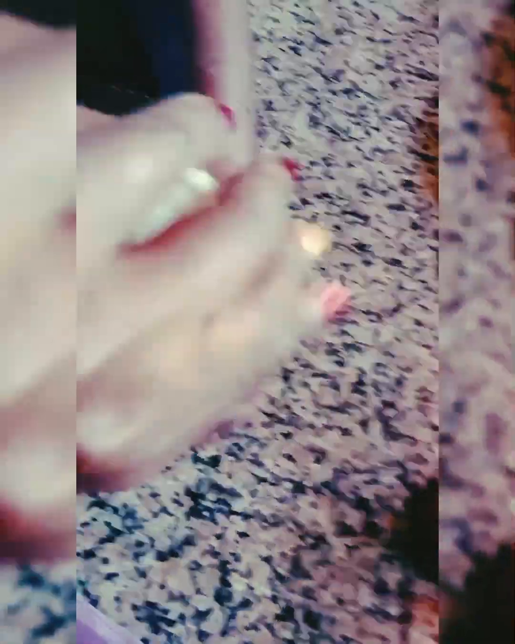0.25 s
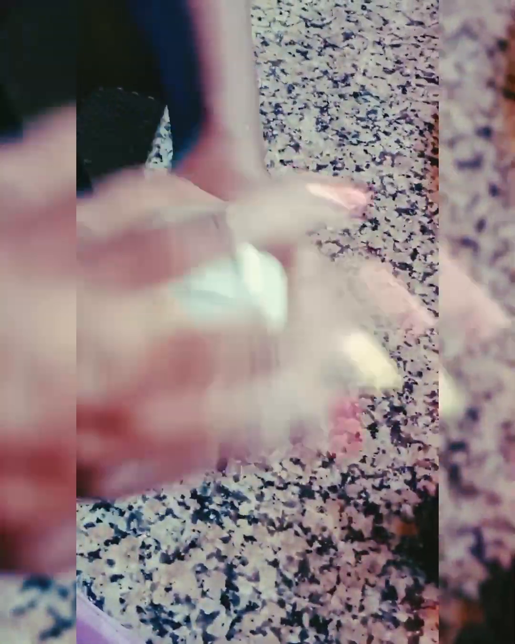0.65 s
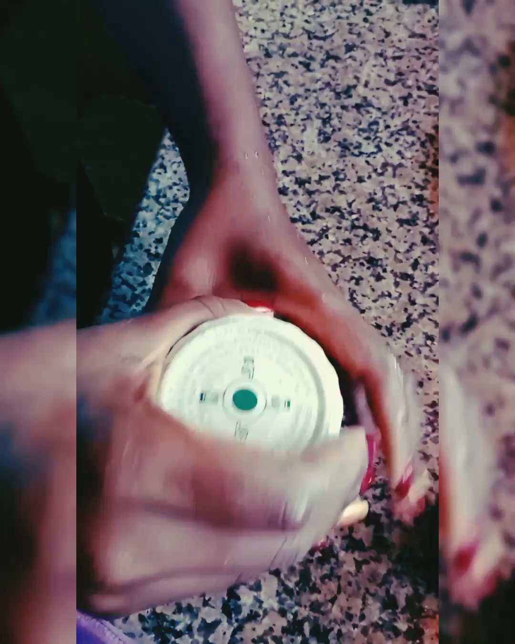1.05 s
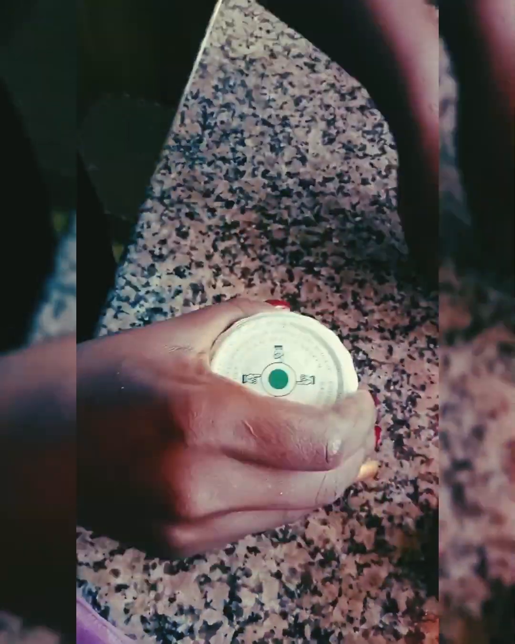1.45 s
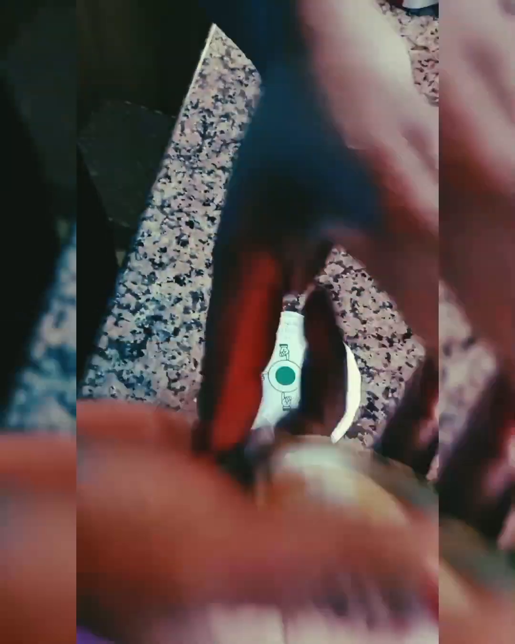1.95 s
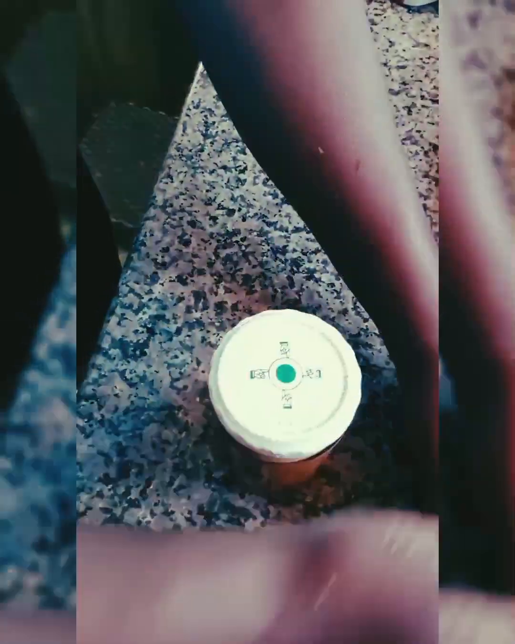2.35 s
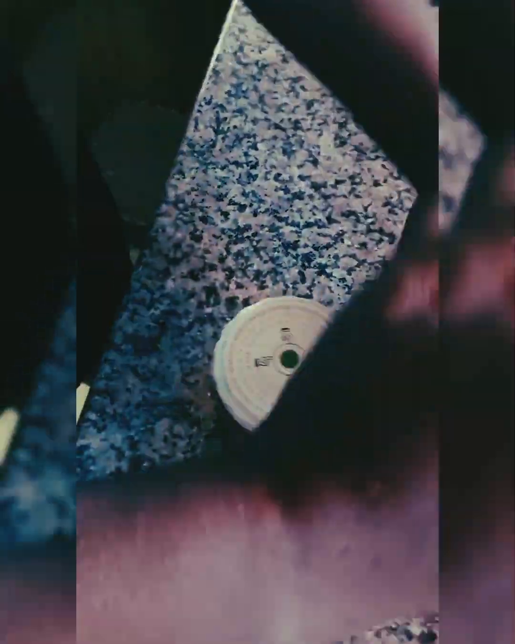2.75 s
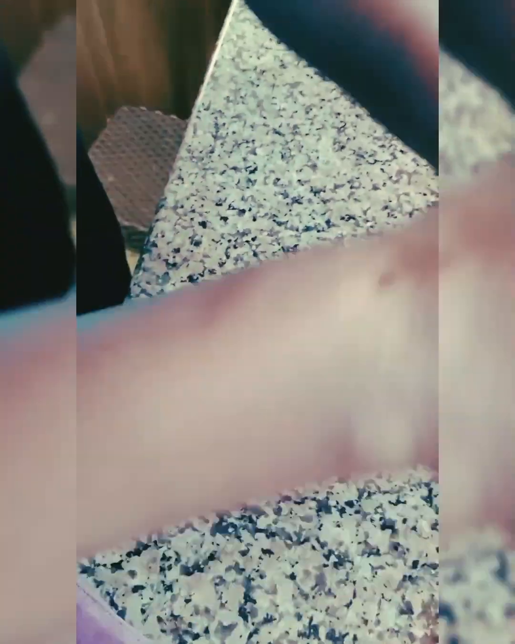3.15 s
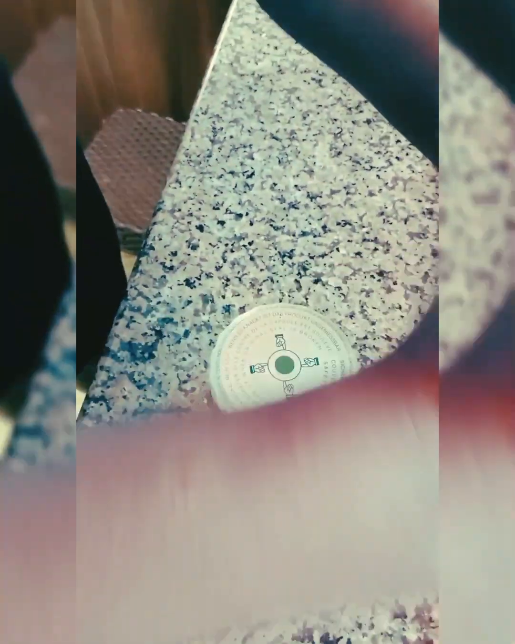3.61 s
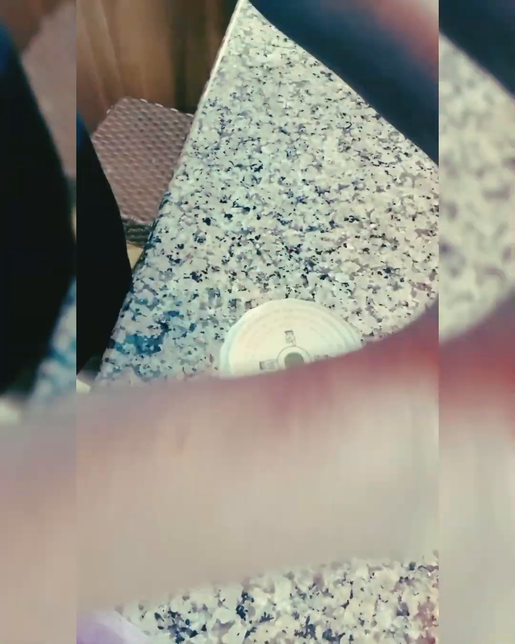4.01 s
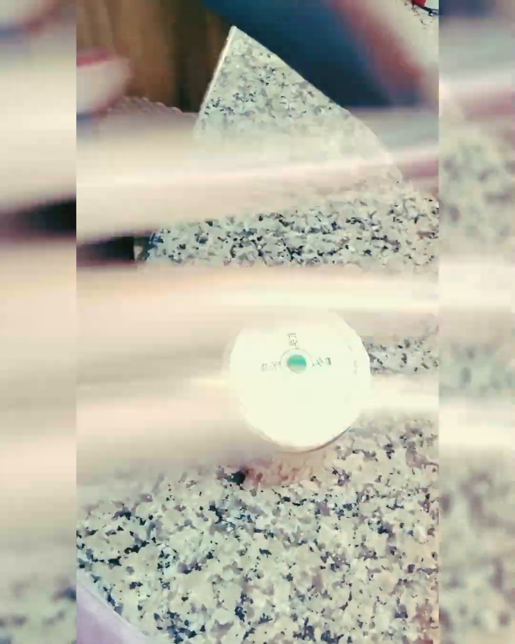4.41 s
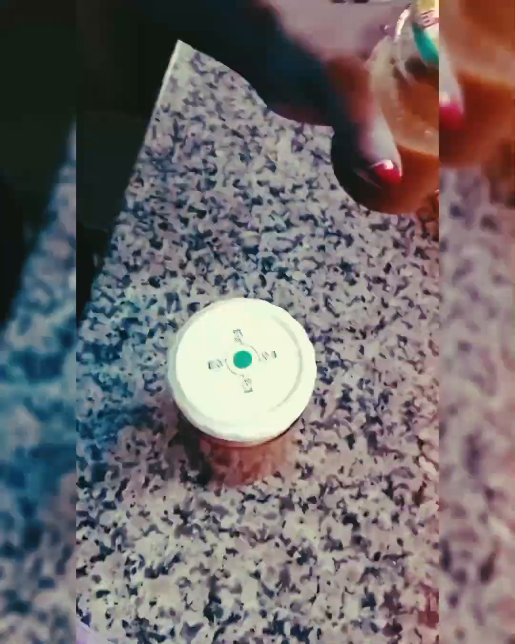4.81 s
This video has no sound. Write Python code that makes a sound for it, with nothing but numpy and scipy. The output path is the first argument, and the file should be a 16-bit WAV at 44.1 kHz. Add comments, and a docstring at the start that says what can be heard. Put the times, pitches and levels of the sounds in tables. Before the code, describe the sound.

Close handling of a lidded glass jar on a stone counter in a small reverberant kitchen. Faint taps and rubbing first, then two clusters of dull heavy knocks, a pause, and a busy run of bright lid snaps with hollow pops, another hard knock, scrapes and ticks. It ends nearly quiet over a low wash. The phone-like microphone is muffled on top, and loud hits clip.

```python
"""In a small, hard-walled kitchen, glass jars are set down on a stone countertop and a metal lid is worked.
Jars are dying sines with a noise thud; lid snaps crack, ring the rim and pump the pocket of air under it.
Soft taps and light ticks use parts of the snap; random slips make the scrapes, gliding sines the squeaks.
Noise echoes make the room, over a low steady wash.
The microphone colours the sound, its gain control ducks after loud hits, and the highest peaks clip."""
import sys
import numpy as np
from scipy import signal
from scipy.io import wavfile

SR = 44100
rng = np.random.default_rng(int(sys.argv[2]) if len(sys.argv) > 2 else 0)


def file_out(sig):
    """Save sig as 16-bit WAV at sys.argv[1]."""
    # one column per channel
    cols = np.atleast_2d(sig).T
    # limit, then scale
    lim = np.clip(cols, -1, 1)
    pcm = np.round(lim * 32767).astype(np.int16)
    wavfile.write(sys.argv[1], SR, pcm)


N = 223570  # length in samples, about 5.07 s


def amp(db):
    """Turns decibels into a gain."""
    return 10 ** (np.asarray(db) / 20)


def evened(x):
    """Scales a sound to an average (rms) level of 1."""
    return x / np.sqrt(np.mean(x ** 2) + 1e-20)


def read(points, hz):
    """Reads a table between its points, on a log-frequency axis."""
    table_hz, value = np.transpose(points)
    return np.interp(np.log(hz + 1), np.log(table_hz + 1), value)


def add(mix, s, sound):
    """Mixes a sound in at time s, cutting what runs past the end."""
    part = mix[max(round(s * SR), 0):][:len(sound)]
    part += sound[:len(part)]


def colour(x, points, size=4096):
    """Filters a sound to the given spectrum, with no sound before its cause (minimum phase)."""
    log_gain = np.log(amp(read(points, abs(np.fft.fftfreq(size, 1 / SR)))))
    spectrum = np.exp(np.conj(signal.hilbert(log_gain)))
    response = np.fft.ifft(spectrum).real[:size // 2]
    return signal.oaconvolve(x, response)[:len(x)]


def soften(x, hz, order=2):
    """Takes away treble above hz, as a softer, longer contact does."""
    lowpass = signal.butter(order, min(hz, SR / 2 - 100), fs=SR, output="sos")
    return signal.sosfilt(lowpass, x)


def decay(t, t60):
    """Dies away by 60 dB in t60 seconds."""
    return np.exp(-np.log(1000) * t / t60)


def ring(modes, t):
    """Dying sines of a struck object; neighbouring modes swing in opposite directions."""
    out = np.zeros(len(t))
    for k, (hz, db, t60) in enumerate(modes):
        out += (-1) ** k * amp(db) * decay(t, t60) * np.sin(2 * np.pi * hz * t)
    return out


def resonate(x, peaks):
    """Passes a sound through resonances side by side, each applied twice to make it steep."""
    out = np.zeros(len(x))
    for hz, width, db in peaks:
        b, a = signal.iirpeak(hz, hz / width, SR)
        once = signal.lfilter(b, a, x)
        out += amp(db) * signal.lfilter(b, a, once)
    return evened(out)


# Spectrum of the thin metal's crack. Each row: frequency in Hz, relative level in dB.
CRACK_SPECTRUM = [(100, -29), (700, -14), (1600, -26), (2200, -1.5), (2850, 3), (3400, -1), (4300, 3.5),
                  (5000, -4.5), (5800, -2.5), (7500, -6), (16000, -1)]


def crack(t, bright_hz, crack_db=-7, crack_s=0.0046):
    """A few milliseconds of grit from the thin metal: coloured noise that dies quickly."""
    grit = evened(colour(rng.standard_normal(len(t)), CRACK_SPECTRUM)) * np.exp(-t / crack_s)
    return amp(crack_db) * soften(grit, bright_hz, order=4)


# Glass meets stone, each landing in several contacts.
# Each row: start in seconds, force in dB, brightness (where the treble starts to fall) in Hz.
KNOCK_CONTACTS = [(1.4348, 2.5, 1310), (1.4395, -1, 1100), (1.4474, -1.5, 1070), (1.4542, -7.5, 1000),
                  (1.6523, -3.5, 2760), (1.6606, -2, 2000), (1.6640, -8.5, 2000), (2.8214, -2, 3180),
                  (2.8285, -5.5, 2600), (2.836, 0, 2300), (2.8470, 5, 2570)]
# A jar standing on the stone; the lowest modes are the counter's.
# Each row: frequency in Hz, relative level in dB, time to die by 60 dB in seconds.
JAR_MODES = [(138, -20.5, 0.24), (247, -27, 0.5), (320, -24, 0.21), (620, -17, 0.063), (776, -19, 0.12),
             (932, -17, 0.022), (1003.8, -8, 0.11), (1038, -19, 0.28), (1108, -9, 0.064),
             (1260, -12.5, 0.063), (1428, -16, 0.0079), (1605, -20, 0.055), (1860, -29.5, 0.038),
             (2032, -36.5, 0.24), (2542, -14.5, 0.038), (2620, -14, 0.015), (3770, -28.5, 0.013)]
# Dull thud of counter and cabinet. Each row: frequency in Hz, relative level in dB.
THUD_SPECTRUM = [(40, -43.5), (75, -3.5), (115, 4), (180, -6.5), (300, 0), (550, -1.5), (1300, 0),
                 (2400, -12), (3400, -20.5), (6000, -22.5), (9000, -60.5)]


def knocks(ring_db=-4.0, thud_db=-10, thud_s=0.014, rise_s=0.0012, lid_db=-4):
    """Each contact rings the jar, thumps the counter and jolts the lid; the heavy glass starts gradually."""
    out, t = np.zeros(N), np.arange(SR // 2) / SR
    glass = ring(JAR_MODES, t)
    rise = 1 - np.exp(-t / rise_s)
    for s, force_db, bright_hz in KNOCK_CONTACTS:
        thud = evened(colour(rng.standard_normal(len(t)), THUD_SPECTRUM)) * np.exp(-t / thud_s)
        blow = soften((amp(ring_db) * glass + amp(thud_db) * thud) * rise, bright_hz)
        add(out, s, amp(force_db) * (blow + amp(lid_db) * crack(t, bright_hz)))
    return out


def air_pocket(t, hz, t60, bright_hz, swell_cycles=4, push_db=-14, push_s=0.0054):
    """The lid pumps the air under it: a puff and a short note, slower to start after a soft contact."""
    puff = soften(resonate(rng.standard_normal(len(t)), [(0.76 * hz, hz, 0)]), 2 * hz)
    push = amp(push_db) * evened(puff) * np.exp(-t / push_s)
    swell = 1 - np.exp(-t * bright_hz / swell_cycles)
    return (ring([(hz, 0, t60)], t) + push) * swell


# The metal lid snaps as it is worked. Each row: start in seconds, air pocket level in dB,
# air pocket pitch in Hz, air pocket time to die by 60 dB in seconds, crack level in dB,
# brightness in Hz, rim ring level in dB.
LID_SNAPS = [(2.4972, -5, 966, .075, -0.5, 9100, 3.5), (2.5803, -16.5, 663, 0.044, -36.5, 4000, -13.5),
             (2.6045, -6, 1041, 0.031, -1.5, 3800, -28), (2.6075, -0.5, 663, 0.042, -17, 3000, -23),
             (2.6308, -1, 564, 0.054, 0.5, 6500, -46), (2.9392, 0.5, 546, 0.039, -4, 5450, -22.5),
             (3.117, -19.5, 551, 0.05, -25, 3470, -59), (3.3830, 0.5, 807, 0.022, -8.5, 5160, -27),
             (3.3908, 0.5, 597, 0.0052, -5.5, 5430, -31.5)]
# Rim of lid and jar, damped by the hand.
# Each row: frequency in Hz, relative level in dB, time to die by 60 dB in seconds.
RIM_MODES = [(1400, -22, 0.043), (2810, -16, 0.057), (3792, -0.5, 0.014), (4019, -2, 0.0092),
             (4900, -22, 0.0088), (6380, -20, 0.011)]


def snaps():
    """The lid cracks, rings the rim and pumps the air under it."""
    out, t = np.zeros(N), np.arange(SR // 5) / SR
    for s, air_db, air_hz, air_t60, crack_db, bright_hz, rim_db in LID_SNAPS:
        metal = amp(crack_db) * crack(t, bright_hz) + amp(rim_db) * ring(RIM_MODES, t)
        air = amp(air_db) * air_pocket(t, air_hz, air_t60, bright_hz)
        add(out, s, metal + air)
    return out


# Dull taps and bumps on the lid. Each row: start in seconds, level in dB, air pocket pitch in Hz,
# level sent to the room in dB against the direct sound.
LID_TAPS = [(.008, -25, 940, 5), (0.018, -25.5, 1165, 2.5), (0.3864, -16.5, 1252, -10),
            (0.3862, -27.5, 1477, -0.5), (.421, -24.5, 317, 7), (2.3816, -11.5, 1121, -5.5),
            (2.388, -8, 1040, -7), (2.390, -21.5, 574, 7), (3.151, -33, 528, -7.5), (3.290, -19, 557, 2),
            (3.3226, -19, 770, -5), (3.4775, -14, 440, 3), (3.656, -7.5, 458, -9), (3.747, -13, 779, -15.5)]


def taps(air_t60=0.028, crack_db=-20.5, bright_hz=2130):
    """Soft contacts sound the air and barely crack the metal; gives direct sound and what the room gets."""
    direct, to_room, t = np.zeros(N), np.zeros(N), np.arange(SR // 5) / SR
    for s, db, air_hz, room_db in LID_TAPS:
        air = air_pocket(t, air_hz, air_t60, bright_hz)
        tap = air + amp(crack_db) * crack(t, bright_hz)
        add(direct, s, amp(db) * tap)
        add(to_room, s, amp(db + room_db) * tap)
    return direct, to_room


# Light ticks of fingernails and of the lid's edge catching. Each row: start in seconds, level in dB.
LIGHT_TICKS = [(.008, -24), (0.126, -36), (0.615, -40), (.7293, -42), (0.766, -39), (1.827, -47),
               (1.9995, -42.5), (3.3207, -31.5), (3.6872, -16), (3.72, -21), (3.7836, -28), (3.809, -25.5),
               (4.5299, -51), (5.016, -39)]


def ticks(bright_hz=5500):
    """Contacts too light to move the air: only the metal is heard."""
    out, t = np.zeros(N), np.arange(SR // 5) / SR
    for s, db in LIGHT_TICKS:
        add(out, s, amp(db) * crack(t, bright_hz))
    return out


# Lid and glass rub in short strokes. Each row: start in seconds, push in seconds,
# ease-off in seconds, hollow level in dB, rasp level in dB.
RUB_STROKES = [(0, 0.004, .15, -35, -38.5), (.19, 0.046, 0.29, -49.5, -58.5),
               (.385, 0.088, 0.71, -48, -56.5), (3.284, 0.053, 0.094, -28.5, -49.5),
               (3.395, 0.096, .17, -20.5, -33.5), (3.629, 0.039, 0.14, -19.5, -32.5),
               (4.121, 0.073, 0.11, -40.5, -42.5), (4.34, 0.068, 0.29, -62, -62),
               (5.005, 0.066, 0.081, -47, -48)]
# Low resonances of the jar's air. Each row: frequency in Hz, width of one pass in Hz, relative level in dB.
HOLLOW_PEAKS = [(309, 94, -10.5), (445, 166, 1.5), (589, 138, -1), (811, 47.4, 6.5), (1040, 164, -12.5)]
# High resonances of the lid's rim. Each row: frequency in Hz, width of one pass in Hz, relative level in dB.
RASP_PEAKS = [(2060, 120, 7.5), (2410, 1140, 11), (2820, 140, -6), (3190, 1500, 0), (4026, 220, 7.5),
              (4290, 270, -1), (5250, 3000, -15)]
# A stroke swells to its hardest push, then eases off; both ends fade over the edge time.
STROKE_START_DB, STROKE_END_DB, STROKE_EDGE_S = -11, -26, 0.0062


def scrapes(slips_per_s=300, uneven_db=3.5, hiss=0.11, hollow_db=-3, rasp_db=-3):
    """Tiny uneven slips excite the jar's air and the lid's rim, as strongly as the hand pushes."""
    slip_size = amp(uneven_db * np.minimum(rng.exponential(1, N), 3))
    slips = (rng.random(N) < slips_per_s / SR) * slip_size
    drive = slips * rng.choice([-1, 1], N) + hiss * rng.standard_normal(N)
    hollow = resonate(drive, HOLLOW_PEAKS)
    rasp = resonate(drive, RASP_PEAKS)
    out, t = np.zeros(N), np.arange(N) / SR
    for start, push_s, ease_s, low_db, high_db in RUB_STROKES:
        top = start + push_s
        end = top + ease_s
        touching = np.clip(np.minimum(t - start, end - t) / STROKE_EDGE_S, 0, 1)
        push_db = np.interp(t, [start, top, end], [STROKE_START_DB, 0, STROKE_END_DB])
        rub = amp(hollow_db + low_db) * hollow + amp(rasp_db + high_db) * rasp
        out += touching * amp(push_db) * rub
    return out


# Thin squeaks of the rubbing. Each row: start in seconds, length in seconds,
# starting pitch in Hz, final pitch in Hz (both before the waver), level in dB.
RUB_SQUEAKS = [(1.521, .1, 4320, 4160, -58), (4.209, 0.041, 4080, 5800, -56)]


def squeaks(waver=0.039, curve=2.7):
    """Stick and slip make short, unsteady whistles whose glide steepens towards the end."""
    out = np.zeros(N)
    for start, length, from_hz, to_hz, db in RUB_SQUEAKS:
        along = np.arange(0, length, 1 / SR) / length
        glide = from_hz + (to_hz - from_hz) * along ** curve
        pitch = glide * (1 + waver * evened(soften(rng.standard_normal(len(along)), 500)))
        whistle = np.sin(2 * np.pi * np.cumsum(pitch) / SR)
        add(out, start, amp(db) * whistle * signal.windows.tukey(len(along), .2))
    return out


# Ring of the kitchen. Each row: frequency in Hz, time to die by 60 dB in seconds.
KITCHEN_DECAY = [(120, 0.61), (400, 0.37), (1000, 0.47), (2500, 0.48), (4500, 0.31), (7000, 0.27),
                 (10000, 0.12)]


def kitchen(x, build_s=0.008, size=256):
    """Dense wall echoes that build up quickly, each band dying at its own speed."""
    hz, t, bands = signal.stft(rng.standard_normal(SR), SR, nperseg=size)
    fading = bands * decay(t, read(KITCHEN_DECAY, hz)[:, None])
    tail = signal.istft(fading, SR, nperseg=size)[1]
    age = np.arange(len(tail)) / SR
    swell = 1 - np.exp(-age / build_s)
    # levelled by the strength of a plain 0.52 s decay
    strength = np.linalg.norm(swell * decay(age, 0.52))
    return signal.fftconvolve(x, tail * swell / strength)[:N]


# Kitchen background. Each row: frequency in Hz, relative level in dB.
BACKGROUND_SPECTRUM = [(25, -37), (50, -17.5), (85, -1), (135, 1), (175, -6.5), (260, -5.5), (400, -6),
                       (580, -0.5), (950, -12), (1600, -22.5), (4200, -32), (6500, -40), (8200, -53.5),
                       (16000, -53)]


def background(level_db=-51.5, drift_db=1):
    """Low steady wash of the kitchen: coloured noise whose level drifts slightly."""
    t = np.arange(N) / SR
    drift = np.zeros(N)
    for drift_hz in np.geomspace(.5, 9, 12):
        drift += np.sin(2 * np.pi * (drift_hz * t + rng.random()))
    wash = evened(colour(rng.standard_normal(N), BACKGROUND_SPECTRUM))
    return amp(level_db + drift_db * evened(drift)) * wash


# Microphone colour. Each row: frequency in Hz, gain in dB.
MICROPHONE_COLOUR = [(30, -13), (100, -6.5), (1000, -0.5), (4400, 1), (6000, -3.5), (7200, -13),
                     (8500, -24.5), (16000, -21)]


def scene(knock_room_db=0.5, snap_room_db=-2, tick_room_db=-6, scrape_room_db=-8):
    """Jars, lid and rubbing with the room's answer, through the microphone's colour, over the background."""
    direct, to_room = taps()
    sources = [(knocks(), knock_room_db), (snaps(), snap_room_db),
               (ticks(), tick_room_db), (scrapes() + squeaks(), scrape_room_db)]
    for sound, room_db in sources:
        direct = direct + sound
        to_room = to_room + amp(room_db) * sound
    heard = direct + kitchen(to_room)
    return (colour(heard, MICROPHONE_COLOUR) + background())[None]


def record(dry, threshold_db=-17, squeeze=0.99, recover_db_per_s=75, attack_s=0.0041, ceiling=0.71):
    """Gain control ducks shortly after each loud hit, peaks over the ceiling clip, then treble is cut."""
    keep = np.exp(-1 / (attack_s * SR))
    smoother = [1 - keep], [1, -keep]
    power_db = 10 * np.log10(signal.lfilter(*smoother, dry[0] ** 2) + 1e-12)
    # the held level jumps up at once, then falls at a steady rate
    fall_db = np.arange(N) * recover_db_per_s / SR
    held_db = np.maximum.accumulate(power_db + fall_db) - fall_db
    over_db = np.maximum(held_db - threshold_db, 0)
    ducked = dry / amp(squeeze * signal.lfilter(*smoother, over_db))
    clipped = np.clip(ducked, -ceiling, ceiling)
    lowpass = signal.firwin(511, 16000, window=("kaiser", 9), fs=SR)  # cutoff in Hz
    return signal.oaconvolve(clipped, lowpass[None], "same")


dry = scene()
out = record(dry)
file_out(out)
```